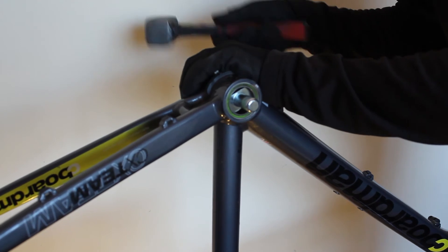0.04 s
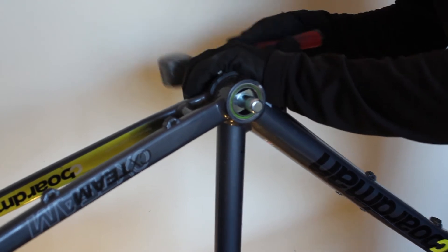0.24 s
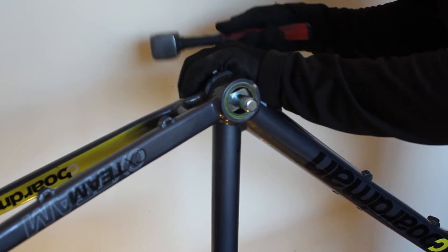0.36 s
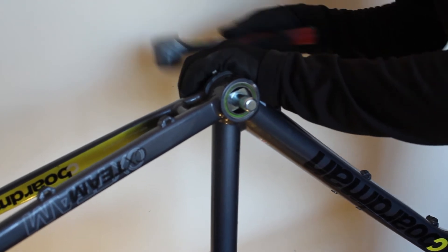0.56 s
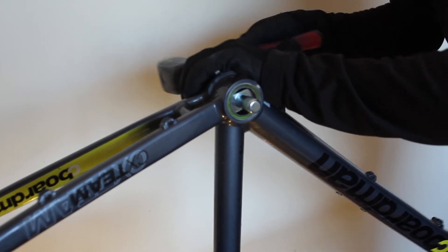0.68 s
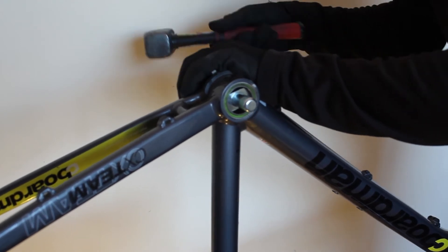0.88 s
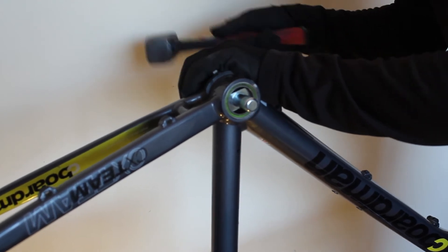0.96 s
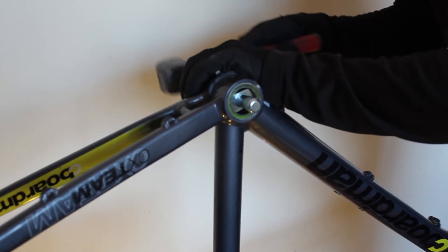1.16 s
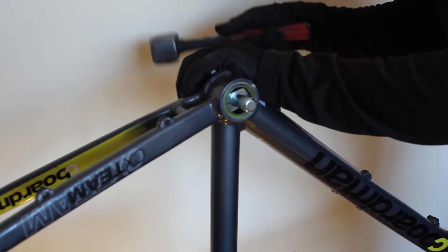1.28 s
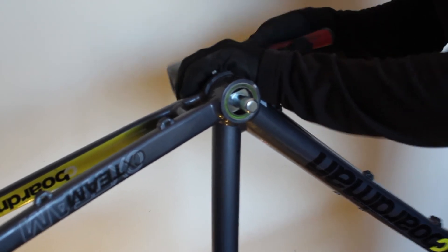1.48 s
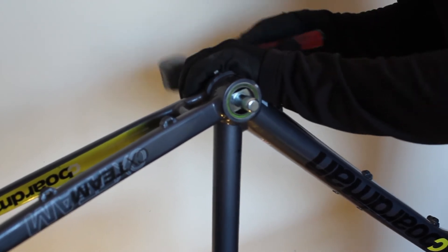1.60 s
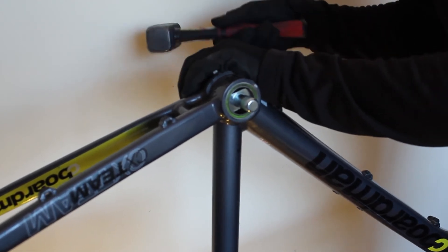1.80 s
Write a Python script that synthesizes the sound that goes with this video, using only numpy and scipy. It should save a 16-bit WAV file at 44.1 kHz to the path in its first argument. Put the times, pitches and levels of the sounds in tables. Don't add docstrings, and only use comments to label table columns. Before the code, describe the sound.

Faint hiss, low hum and tiny metal taps open the scene. Hard hammer blows on a steel bar land at about 0.2, 0.67, 1.1 and 1.53 seconds: a distorted crack, brief rattle and hand-damped clang, with a low wavering ring from hollow tubes. The first is loudest, the second brightest, the third duller. Hiss drops after the first; short room reverberation follows each, fading towards 2 seconds.

```python
import sys
import numpy as np
from scipy import signal
from scipy.fft import rfft, irfft
from scipy.io import wavfile

SR = 44100
rng = np.random.default_rng(int(sys.argv[2]) if len(sys.argv) > 2 else 0)


def voltage_ratio(decibels):
    exponent = np.asarray(decibels, float) / 20
    return 10 ** exponent


def persist_wave(psi):
    counts = np.round(np.clip(psi, -1, 1) * 32767).astype(np.int16)
    wavfile.write(sys.argv[1], SR, np.atleast_2d(counts).T)


N = 81585
TILT_FROM_HZ = 940


def table(points, hz):
    p = np.array(points, float)
    return np.interp(np.log(np.maximum(hz, 1)), np.log(p[:, 0]), p[:, 1])


def tilt(hz, db_per_octave):
    return db_per_octave * np.log2(np.maximum(hz, TILT_FROM_HZ) / 2000)


def colour(x, points, tilt_db=0):
    hz = np.arange(2049) * SR / 4096
    gain = voltage_ratio(table(points, hz) + tilt(hz, tilt_db))
    cepstrum = irfft(np.log(gain))
    cepstrum[1:2048] *= 2
    cepstrum[2049:] = 0
    impulse = irfft(np.exp(rfft(cepstrum)))[:2048]
    return signal.fftconvolve(x, impulse)[:len(x)]


def unit(x):
    return x / np.sqrt(np.mean(x ** 2))


def fade(t, t60):
    return (t >= 0) * np.exp(-np.log(1000) * np.maximum(t, 0) / t60)


def ring(t, hz, db, t60):
    return voltage_ratio(db) * fade(t, t60) * np.sin(2 * np.pi * hz * t)


# pitch_hz, level_db [dB per Hz]
CRACK_COLOUR = [(40, -36.5), (130, -22.5), (300, -3.5), (500, -12), (800, -0.5), (1400, -5.5), (3100, -3.4),
                (15500, -11.5)]
CRACK_DB, RATTLE_T60_S = -2.5, 0.027
SHUDDER_DB, SHUDDER_T60_S = -11, 0.12


def crack(t, tilt_db, hold_s):
    contact = (t >= 0) * (t < hold_s)
    rattle = contact + fade(t - hold_s, RATTLE_T60_S)
    shape = rattle + voltage_ratio(SHUDDER_DB) * fade(t, SHUDDER_T60_S)
    noise = rng.standard_normal(N)
    steady_level = np.std(colour(noise, CRACK_COLOUR, tilt_db))
    return voltage_ratio(CRACK_DB) * colour(noise * shape, CRACK_COLOUR, tilt_db) / steady_level


TUBE_HZ = [470, 660, 750, 829, 900, 1048, 1087, 1220, 1405, 1530, 1690, 1730, 1922, 2090]
# level_db, t60_s
TUBE_RINGS = [(-29, .17), (-37.5, 0.06), (-32.5, 0.09), (-26, 0.094), (-27.5, .2), (-25, .28),
              (-25.5, 0.69), (-28, 0.3), (-24.5, 0.21), (-26.5, 0.43), (-27.5, 0.22), (-27.5, 0.49),
              (-23.5, 0.37), (-27, 0.52)]
BAR_HZ = [2180, 2428, 2590, 2950, 3050, 3160, 3205, 3780, 4093, 4520, 5017, 6180, 6697, 7020]
# level_db, t60_s
BAR_RINGS = [(-28, 0.11), (-23, 0.27), (-27.5, 0.12), (-28.5, 0.37), (-27.5, 0.4), (-26, .2), (-31, 0.23),
             (-30, 0.13), (-29.5, 0.28), (-26.5, 0.2), (-27, 0.56), (-27, 0.21), (-27.5, 0.15),
             (-24.5, 0.36)]
# pitch_hz, level_db, t60_s
CLANG = [(273, -21.5, 0.035), (363, -20.5, 0.029), (703, -16, 0.037), (832.4, -12.5, 0.034),
         (914, -10.5, 0.046), (1763, -10, 0.057), (2650, -11, .03), (3090, -6.5, 0.034), (3220, -6.5, .04)]
MODE_SCATTER_DB, MODE_JITTER = 3, .009
GRIP_T60_S = .3


def frame(t):
    live = t[(t >= 0) & (t < .7)]
    modes = list(zip(TUBE_HZ + BAR_HZ, TUBE_RINGS + BAR_RINGS)) * 5
    chance = rng.standard_normal((len(modes), 2))
    clusters = 0
    for (hz, (db, t60)), (detune, force) in zip(modes, chance):
        struck_hz = hz * (1 + MODE_JITTER * detune)
        struck_db = db + MODE_SCATTER_DB * force
        clusters = clusters + ring(live, struck_hz, struck_db, min(t60, GRIP_T60_S))
    clang = sum(ring(live, *mode) for mode in CLANG)
    return np.pad(0.39 * clusters + clang, (np.sum(t < 0), N))[:N]


STAY_HZ, STAY_DB, STAY_T60_S = 284, -45.5, 1.5
PAIR_HZ, PAIR_DB, PAIR_T60_S, PAIR_BALANCE = 410.2, -29, 1.3, .85
BEAT_HZ, SWELL_S = 6.05, .038
STAY_LOSS_DB, PAIR_LOSS_DB = -4.5, -2.73


def low_ring(t, blow):
    beat = np.pi * BEAT_HZ * (t - SWELL_S)
    middle = 2 * np.pi * PAIR_HZ * t
    pair = (np.sin(middle + beat) + PAIR_BALANCE * np.sin(middle - beat)) / 2
    stay = ring(t, STAY_HZ, STAY_DB + blow * STAY_LOSS_DB, STAY_T60_S)
    return stay + voltage_ratio(PAIR_DB + blow * PAIR_LOSS_DB) * fade(t, PAIR_T60_S) * pair


# pitch_hz, t60_s
ROOM_T60 = [(60, 0.04), (200, 0.43), (500, 0.23), (1000, 0.28), (2000, 0.32), (4850, 0.33), (9000, .24),
            (14000, .16)]
# pitch_hz, level_db
ROOM_COLOUR = [(60, -22), (200, -12), (500, 3.5), (1000, 1.5), (2000, 0.5), (3200, -1.5), (7000, -7),
               (15000, -16)]
ROOM_ONSET_S, LATE_DB, LATE_STRETCH = 0.005, -22.5, 2.53


def room(tilt_db):
    t = np.arange(SR) / SR
    f = np.arange(SR // 2 + 1) + 1.
    tail = 0
    for hz in 45 * 2 ** np.arange(0, 9, .5):
        window = np.cos(np.pi * np.clip(np.log2(f / hz), -.5, .5))
        band = irfft(rfft(rng.standard_normal(SR)) * window, SR)
        t60 = table(ROOM_T60, hz)
        decay = fade(t, t60) + voltage_ratio(LATE_DB) * fade(t, LATE_STRETCH * t60)
        tail = tail + voltage_ratio(table(ROOM_COLOUR, hz) + tilt(hz, tilt_db)) * band * decay
    return tail * (1 - np.exp(-t / ROOM_ONSET_S))


# start_s, pitch_hz, level_db, t60_s
KNOCKS = [
    (.0005, 1416, -50, .12),
    (.0005, 1500, -54, .08),
    (.0005, 1630, -54, .08),
    (.0005, 1040, -53, .1),
    (.0005, 1225, -53, .1),
    (.1045, 800, -43, .02),
    (.1045, 1500, -44, .02),
    (.1045, 5000, -54, .006),
]


def knocks(t):
    return sum(ring(t - s, hz, db, t60) for s, hz, db, t60 in KNOCKS)


# pitch_hz, level_db [dB per Hz]
HUM_COLOUR = [(25, 4.5), (45, 9.5), (90, -8), (150, -19.5), (400, -29.5), (1500, -28), (4000, -38),
              (15500, -44.5)]
# pitch_hz, level_db [dB per Hz]
HISS_COLOUR = [(25, -7), (100, -4.5), (220, -6.5), (600, -1), (1300, -2), (3000, -8), (8000, -15),
               (15500, -17)]
HUM_DB, HISS_DB = -57.5, -54.5
DUCK_DB, DUCK_S = -19.5, 0.11


def floor(t):
    first_s = BLOWS[0][0]
    duck = 1 - np.exp(-np.maximum(t - first_s, 0) / DUCK_S)
    hiss = voltage_ratio(HISS_DB + DUCK_DB * duck) * unit(colour(rng.standard_normal(N), HISS_COLOUR))
    hum = voltage_ratio(HUM_DB) * unit(colour(rng.standard_normal(N), HUM_COLOUR))
    return hiss + hum


# start_s, level_db, brightness [dB per octave], rattle_s, ring_db
BLOWS = [
    (.1930, 4, 1, .007, -1.5),
    (0.6696, 0.5, 1.44, .004, -3.5),
    (1.1058, -1, 0, .003, -3.5),
    (1.5306, 0.5, 1, 0.0025, -4.2),
]
ROOM_DB, ROOM_RING_DB = -8.5, -15


def scene():
    t = np.arange(N) / SR
    out = floor(t) + knocks(t)
    low = 0
    for blow, (s, db, tilt_db, hold_s, ring_db) in enumerate(BLOWS):
        rings = voltage_ratio(ring_db) * frame(t - s)
        tail = room(tilt_db)
        echo = signal.fftconvolve(rings, tail / np.sqrt(np.sum(tail ** 2)))[:N]
        out = out + voltage_ratio(db) * crack(t - s, tilt_db, hold_s)
        out = out + rings + voltage_ratio(ROOM_RING_DB) * echo
        out = out + voltage_ratio(ROOM_DB + ring_db) * np.pad(tail, (int(s * SR), N))[:N]
        low = low * (t < s) + low_ring(t - s, blow)
    return (out + low)[None]


def top_cut(x):
    return signal.sosfilt(signal.butter(12, 15660, fs=SR, output="sos"), x)


CLIP, KNEE, MIC_CUT_HZ = .98, 8, 110


def record(dry):
    clipped = dry / (1 + np.abs(dry / CLIP) ** KNEE) ** (1 / KNEE)
    trimmed = signal.lfilter(*signal.butter(1, MIC_CUT_HZ, "high", fs=SR), clipped)
    return top_cut(np.clip(trimmed, -1, 1))


dry = scene()
out = record(dry)
persist_wave(out)
```